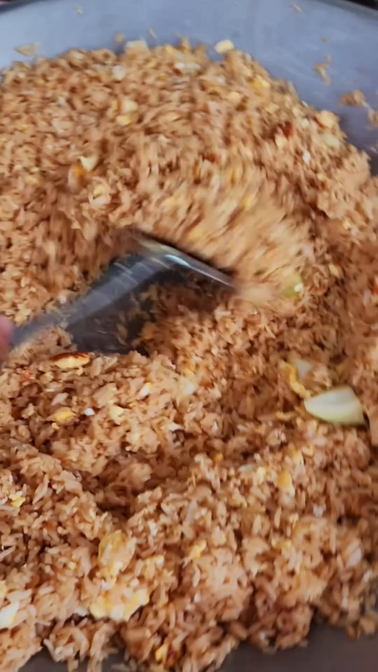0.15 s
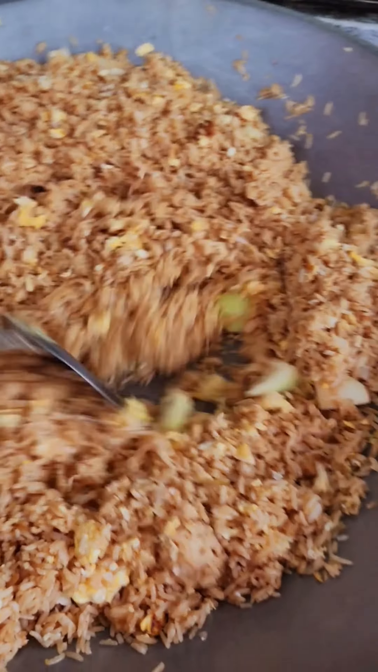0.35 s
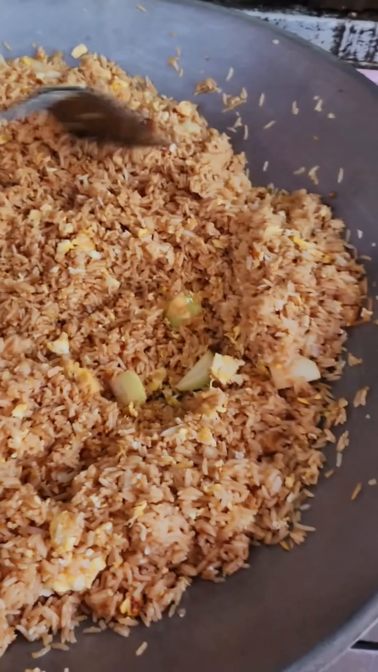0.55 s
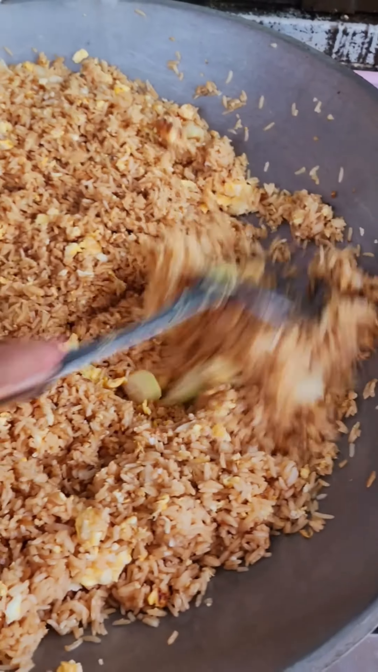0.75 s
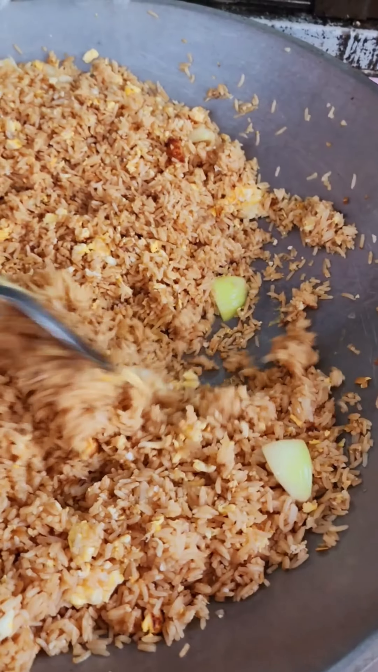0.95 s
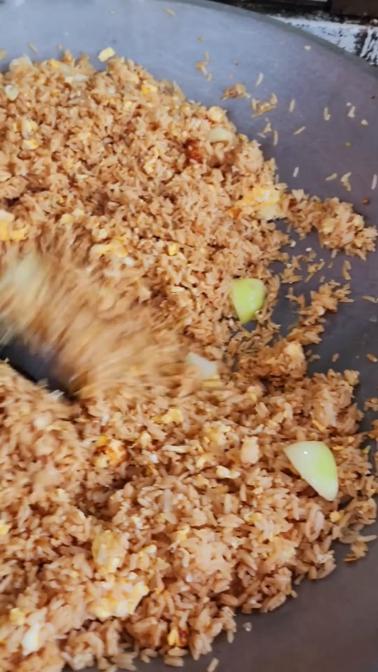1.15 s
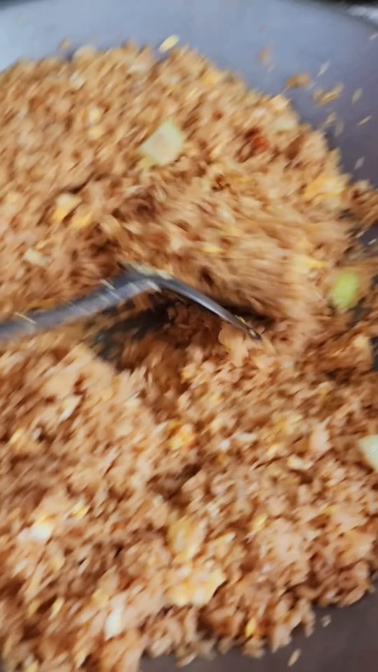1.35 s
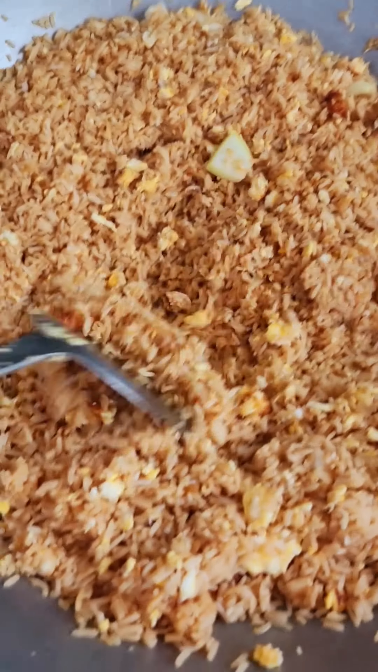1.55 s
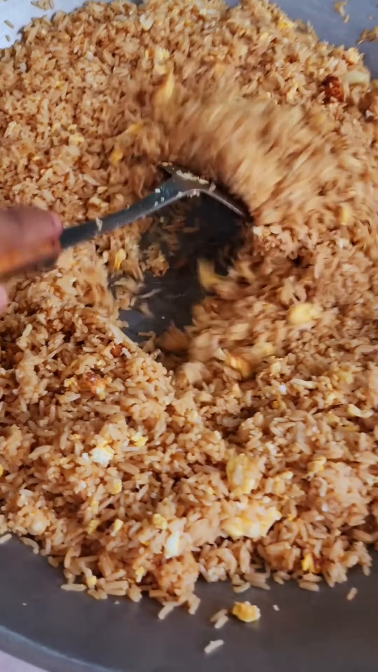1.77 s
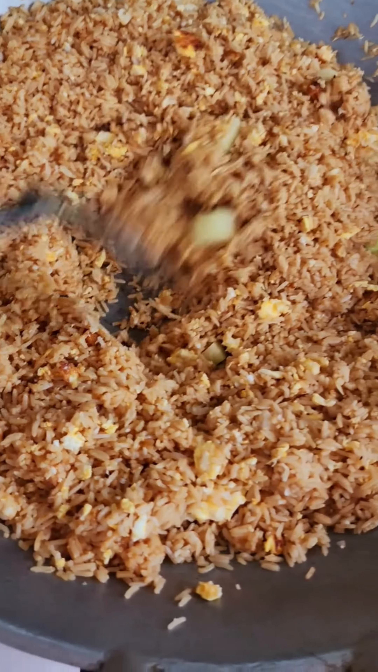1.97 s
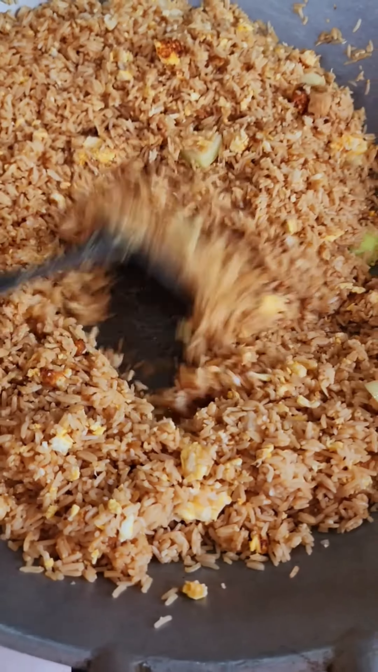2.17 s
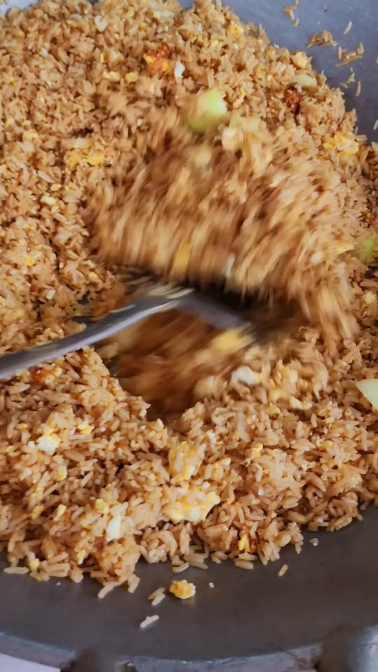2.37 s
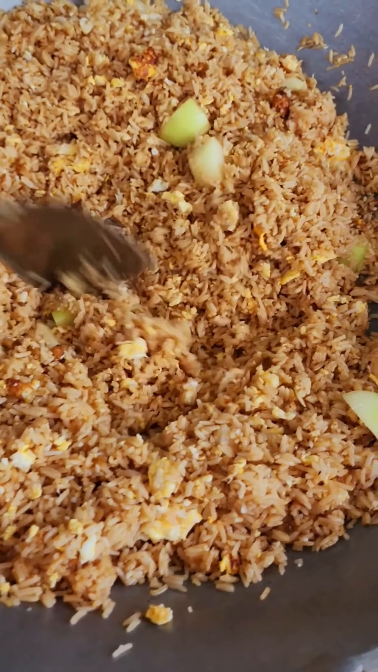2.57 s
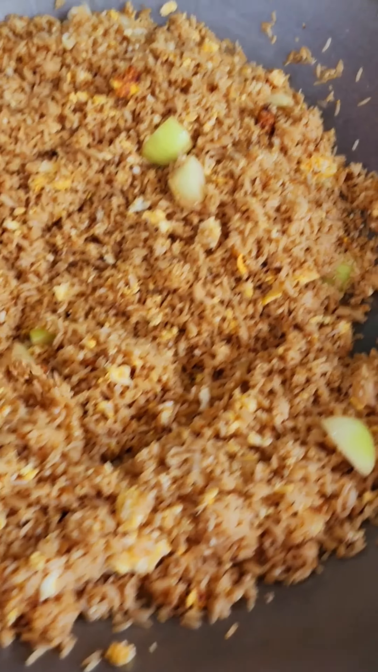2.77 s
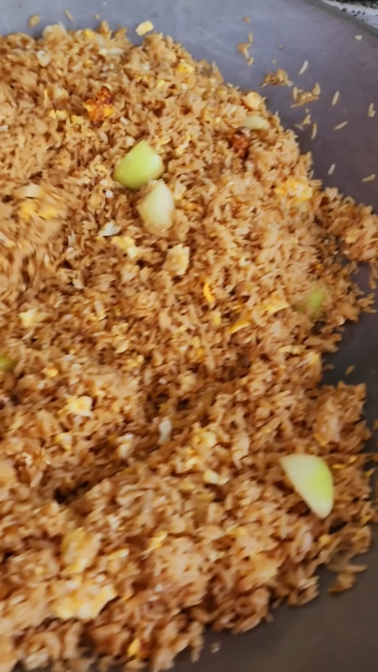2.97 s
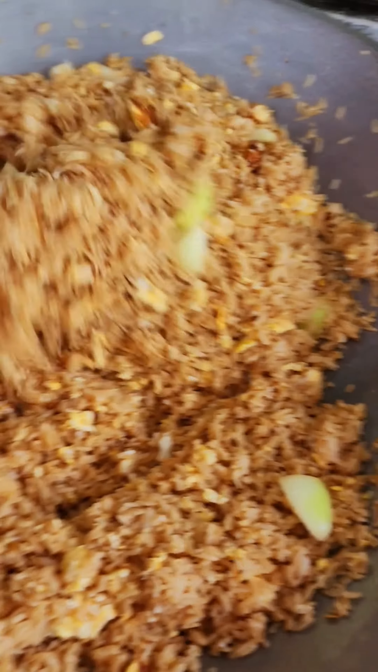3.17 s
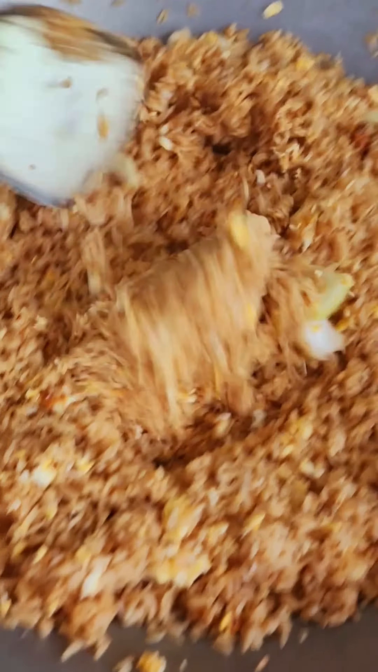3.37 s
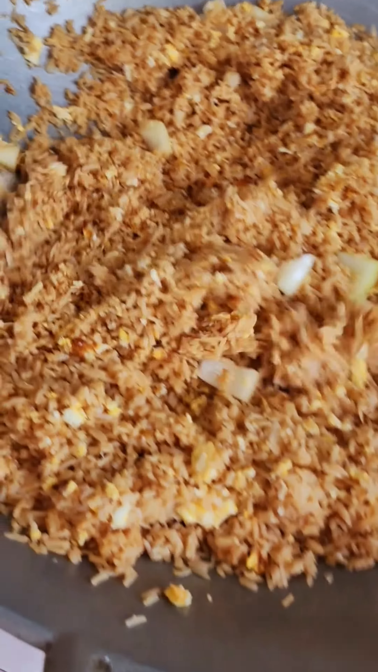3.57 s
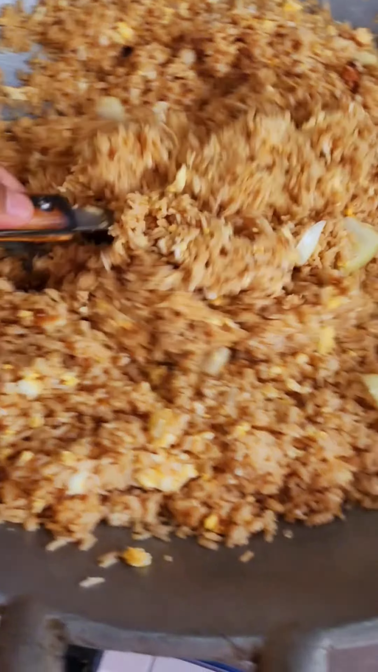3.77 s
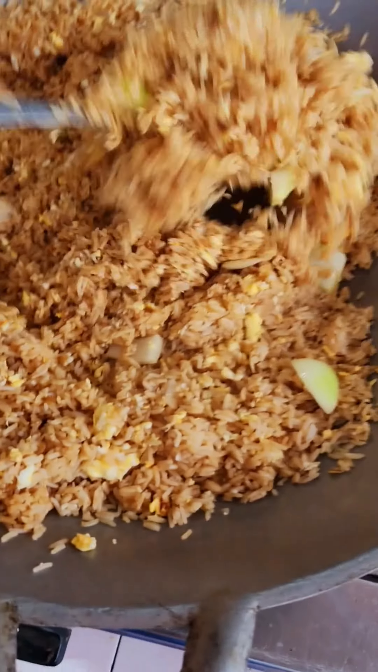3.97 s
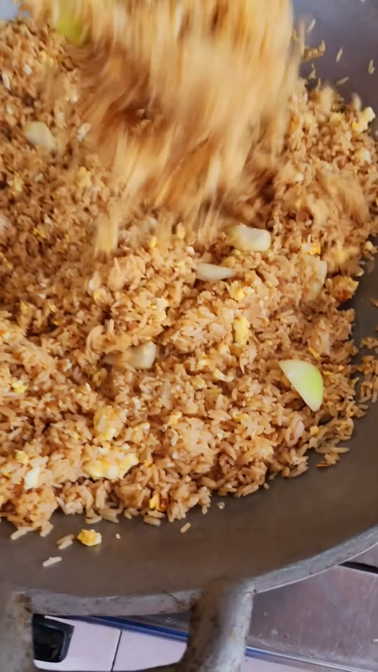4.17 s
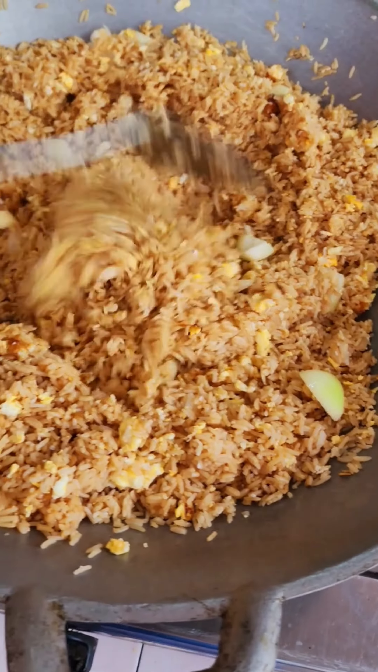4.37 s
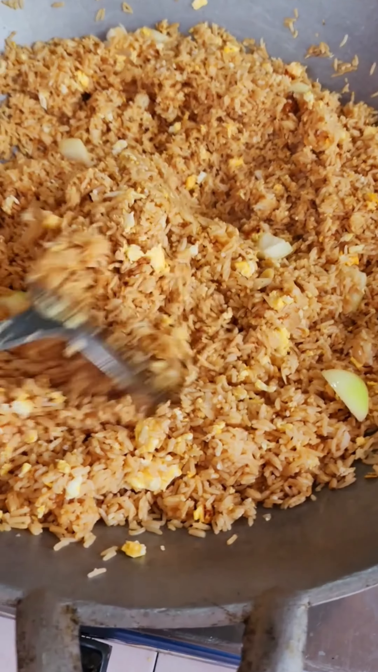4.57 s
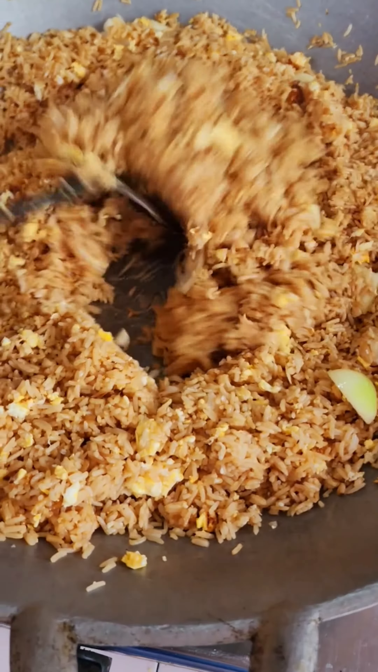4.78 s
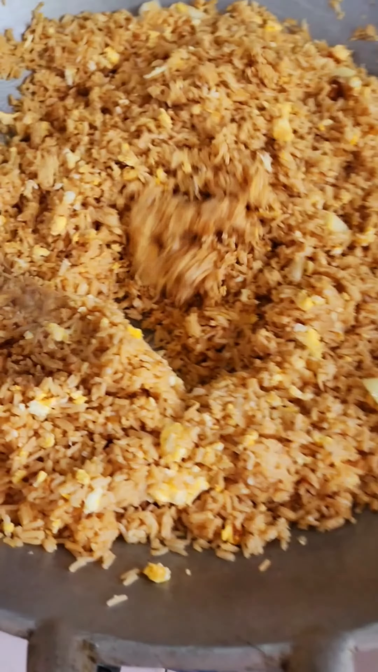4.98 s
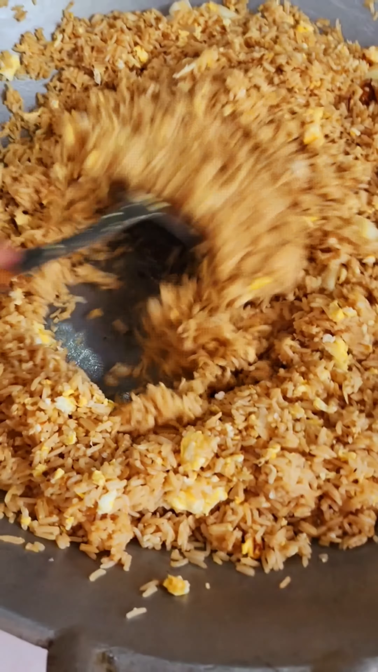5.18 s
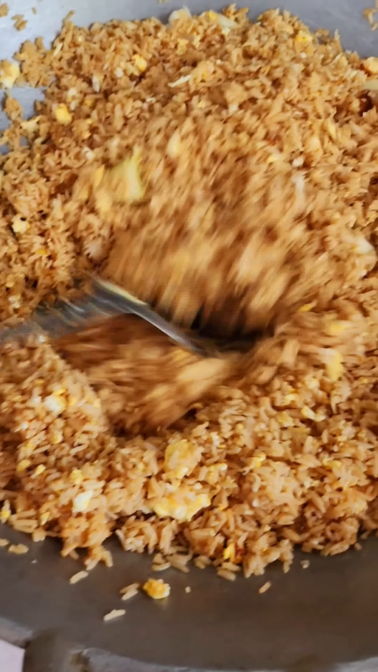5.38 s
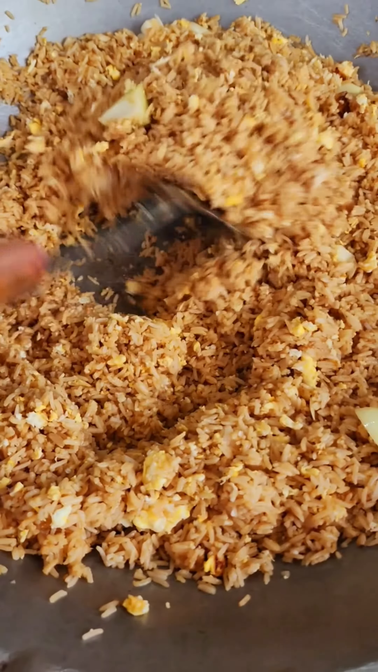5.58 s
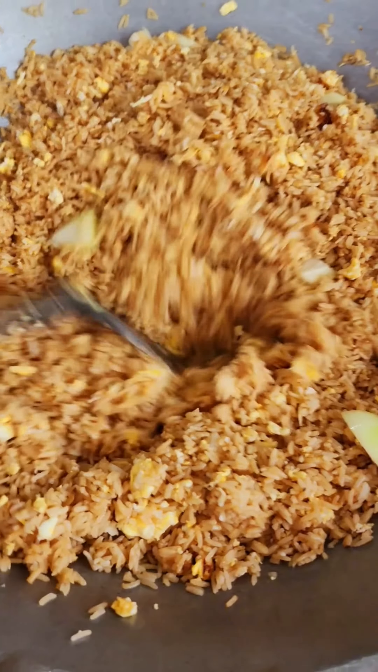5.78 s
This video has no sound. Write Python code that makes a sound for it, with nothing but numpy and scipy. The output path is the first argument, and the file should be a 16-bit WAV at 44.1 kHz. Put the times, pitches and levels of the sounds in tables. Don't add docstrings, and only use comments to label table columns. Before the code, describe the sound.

Constant crackly sizzle and a soft low gas roar lie beneath irregular spatula work. The blade hits the wok with sharp clangs and dull bowl thuds, damped quickly by rice, then stutters over grains. Two longer rasping sweeps fall mid-way, strong digs follow, and rapid scrapes end it. Heard close from above by a handheld phone in a small room.

```python
import sys
import numpy as np
from scipy import signal
from scipy.fft import rfft, irfft, next_fast_len
from scipy.io import wavfile
from scipy.ndimage import uniform_filter1d, map_coordinates

SR = 44100
rng = np.random.default_rng(int(sys.argv[2]) if len(sys.argv) > 2 else 0)


def generate_wav(sig):
    pcm = np.round(np.clip(np.atleast_2d(sig).T, -1, 1) * 32767).astype(np.int16)
    wavfile.write(sys.argv[1], SR, pcm)


def convert_level_to_amplitude(level_db):
    exponent = np.asarray(level_db, float) / 20
    return 10 ** exponent


N = 257103
PORTS = np.array([[.5], [-.5]])

# frequency [Hz], width [Hz], level [dB].
BOWL = [(221, 28, -7), (285, 30, -11), (324, 26, 0), (420, 26, -9), (490, 50, -18), (608, 28, -14),
        (780, 150, -21)]
WALL = [(1390, 197, -1.5), (1569, 118, 3.5), (1825, 190, -12), (1916, 26, 0), (2076, 230, 0)]
BLADE = [(2247, 113, 1.5), (2565, 99, 3.5), (2872, 130, 3), (3303, 160, 1.5), (3566, 240, -1),
         (3810, 220, -4), (4184, 144, 4.5), (4684, 160, 1.5)]
EDGE = [(5120, 250, -4.5), (5740, 630, -1), (6520, 350, -1), (7300, 1100, -4.5), (7910, 1100, -3),
        (9120, 340, -11), (11500, 1500, -10)]
# start [s], length [s], pressure [dB],
# load on the bowl [dB], lean on the wall [dB].
DIGS = [
    (0.0, .025, -29.5, -2, -7),
    (.663, .03, -29, -4, -3),
    (1.039, 0.077, -25, 0, -1.5),
    (1.514, 0.092, -26, 3, -1),
    (1.995, 0.075, -27, 3, -4),
    (3.557, .04, -32, -12, 5),
    (4.546, .118, -25, 1, -2),
    (4.97, .115, -23, -2, -5),
]
# frequency [Hz], density [dB per Hz].
SIZZLE = [(1500, -54), (3000, -7), (4000, -1), (5000, -0.5), (6300, 0), (8000, 0.5), (9000, -4),
          (10000, -6.5), (11000, -3.5), (12000, -.5), (14500, -2), (16500, -4.5)]
# frequency [Hz], left minus right [dB].
LEAN = [(60, -1), (110, 1), (200, 0.5), (380, 1.5), (700, 1.5), (1290, 2), (2380, -1.5), (4400, 2),
        (8120, 2.5), (15000, 5)]


def unit(x):
    return x / np.sqrt(np.mean(x ** 2) + 1e-20)


def along(points, hz):
    f, v = np.transpose(points)
    return np.interp(np.log(hz + 1), np.log(f + 1), v)


def wobble(rate_hz):
    knots = rng.standard_normal(2000)
    return map_coordinates(knots, [np.arange(N) * rate_hz / SR])


def filtered(x, response):
    n = x.shape[-1]
    m = next_fast_len(n + 2048)
    return irfft(rfft(x, m) * response(np.fft.rfftfreq(m, 1 / SR)), m)[..., :n]


def grit(shape, share, spread_db):
    clicks = (rng.random(shape) < share) * convert_level_to_amplitude(spread_db * rng.standard_normal(shape))
    return rng.standard_normal(shape) * (1 + 3 * clicks)


def metal(modes, scatter_db, spread_hz):
    hz, width, db = np.transpose(modes)[:, :, None, None]
    sign = (-1) ** np.arange(len(hz))[:, None, None]
    gain = convert_level_to_amplitude(db + scatter_db * rng.standard_normal(hz.shape)) * sign
    lead_rad = np.clip((hz / spread_hz) ** 2, 0, 2.4) * rng.uniform(-0.81, 1, hz.shape) * PORTS
    return lambda f: gain * np.exp(1j * lead_rad) * 1j * f * width / (hz * hz - f * f + 1j * f * width)


def pressure(s, length, db, rise_s, sag_db, release_db, landing_db):
    n = np.arange(round(s * SR), min(round((s + length) * SR) + SR // 12, N))
    t = n / SR - n[0] / SR
    fall_db = sag_db * np.minimum(t, length) + release_db * np.maximum(t - length, 0)
    landing = landing_db * np.exp(-t / .015)
    return n, t, convert_level_to_amplitude(db - fall_db + landing) * (1 - np.exp(-(t / rise_s) ** 2))


def knocks():
    # time [s], peak [dB], bowl thud [dB], its lowest mode [dB].
    blows = [
        (0.664, -12.5, -14, -8),
        (1.038, 1, -15, -9),
        (1.5126, -2.5, -12.5, -10),
        (1.9941, 0.5, -16, 3),
        (2.6973, -15, -26, -5),
        (3.39, -18, -25, -5),
        (3.5595, -10, -31, -5),
        (4.5443, -1, -11, -12),
        (4.9696, -5, -9, 2),
    ]
    out, t = np.zeros((2, N + SR)), np.arange(SR // 8) / SR
    for s, db, thud_db, deep_db in blows:
        blow = 0.26 * convert_level_to_amplitude(-60 * t / .06) * grit((2, len(t)), 0.041, 4)
        blow[:, [0, 14, 44, 64]] += -1.8, 2.2, -1.4, 1.9
        bright_modes = metal(WALL + BLADE + EDGE[:2], scatter_db=3.5, spread_hz=5700)
        bright = filtered(blow, bright_modes).sum(0) * convert_level_to_amplitude(-60 * t / .08)
        crack = filtered(blow * convert_level_to_amplitude(-60 * t / 0.012),
                         lambda hz: 1j * hz / (900 + 1j * hz) / (1 + 1j * hz / 9000) ** 2)
        clang = bright / np.abs(bright).max() + .8 * crack / np.abs(crack).max()
        push = np.pad(np.hanning(30), (0, len(t) - 30))
        deep, *rest = filtered(push, metal(BOWL[:4], scatter_db=1.5, spread_hz=300))
        thud = (convert_level_to_amplitude(deep_db) * deep + sum(rest)) * convert_level_to_amplitude(-60 * t / 0.18)
        hit = .85 * clang / np.abs(clang).max() + convert_level_to_amplitude(thud_db + 6) * thud / np.abs(thud).max()
        start = round((s + .0003) * SR)
        out[:, start:][:, :len(t)] += convert_level_to_amplitude(db) * hit
    return out[:, :N]


def scrapes():
    # start [s], length [s],
    # pressure [dB], load on the bowl [dB], lean on the wall [dB].
    drags = [(.115, .09, -36, -8, 1), (.7, .1, -42, -8, -1), (2.045, 0.032, -37, 0, 6.5),
             (2.15, .13, -37, -6, -1), (3.24, 0.035, -40, -10, -5), (4.18, 0.06, -36, -12, -1),
             (5.14, .12, -38, -3, 2), (5.31, .065, -24, -5, -4), (5.38, .05, -36, 2, -7),
             (5.475, .07, -34, -3, 1), (5.55, .07, -35, -8, 3), (5.685, .06, -25, -5, -4),
             (5.75, .07, -31, -6, -6)]
    sweeps = [
        (2.696, .05, -35, -12, -14),
        (2.76, .155, -24.5, -15, -14),
        (3.388, .17, -24.5, -16, -15),
    ]
    # start [s], length [s], level [dB], favoured pitch [Hz].
    lumps = [(.0, .07, -35, 480), (.09, .04, -36, 430), (1.171, 0.024, -34, 360), (2.132, 0.028, -34, 320),
             (5.15, .06, -38, 450), (5.415, .045, -29, 440), (5.492, 0.043, -30, 240),
             (5.755, 0.076, -31, 580), (2.72, .05, -36, 240), (5.0, .035, -25, 250),
             (1.075, .035, -27, 340)]
    crunches = [
        (.0, .06, -40, 560),
        (.664, .09, -36, 850),
        (1.04, .07, -38, 700),
        (2.72, .2, -42, 1000),
        (3.39, .15, -44, 900),
        (5.0, .1, -39, 650),
        (5.32, .12, -40, 600),
        (5.69, .09, -36, 650),
    ]
    squeals = [
        (4.99, .09, -25, 6400),
        (2.0, .05, -30, 6000),
        (3.41, .14, -34, 5600),
    ]
    # frequency [Hz], width [Hz], level [dB].
    rice = [(560, 160, 0), (800, 260, -1), (1100, 300, -3)]
    # pitch at first contact [Hz],
    # glide [octaves per s], bend [octaves per dB of lean].
    favoured = [(320, 0, 0), (1800, -.5, -.016), (2850, -.5, -.026), (6400, 0, 0)]

    dig, drag, sweep = (.002, 60, 300, 6, -5, 10), (.03, 20, 300, 0, -8, 0), (.005, 35, 300, 0, -8, 70)
    out = np.zeros((2, N))
    grains = grit((3, N), 0.016, 5) * convert_level_to_amplitude(1.0 * wobble(45) + 1.8 * wobble(200))
    knots = rng.standard_normal((len(BLADE), 400))
    at_knot = np.arange(N) * 45 / SR
    travel_db = 2.87 * np.array([np.interp(at_knot, np.arange(knots.shape[1]), row) for row in knots])
    travel = convert_level_to_amplitude(travel_db)

    def ring(n, modes, pitch_hz, own, reach_octaves, side_db):
        octaves = np.log2(np.transpose(modes)[0][:, None] / pitch_hz)
        favour = travel[:len(modes), n] * convert_level_to_amplitude(-13 * np.tanh((octaves / reach_octaves) ** 2))
        drive = grains[0, n] + own * grains[1:, n]
        ringing = filtered(drive, metal(modes, scatter_db=1.4, spread_hz=1300))
        part = (ringing * favour[:, None]).sum(0)
        level = np.sqrt(np.abs(uniform_filter1d((part ** 2).mean(0), size=2600)) + 1e-12)
        return part / level * convert_level_to_amplitude(side_db * PORTS)

    for rows, (*shape, edge_db, slide_db) in ((DIGS, dig), (drags, drag), (sweeps, sweep)):
        for s, length, db, load_db, lean_db in rows:
            n, t, gain = pressure(s, length, db, *shape)
            lean_db = lean_db + slide_db * np.minimum(t, length)
            # modes, level dB, own grains, reach octaves, side dB
            parts = ((BOWL, load_db, .15, 0.56, 1.5), (WALL, lean_db, .6, 0.25, -1.0),
                     (BLADE, 0, .9, 0.46, 0.3), (EDGE, edge_db, 1.5, 4.4, 0.5))
            for (hz, glide, bend), (modes, part_db, own, reach, side_db) in zip(favoured, parts):
                pitch_hz = hz * 2 ** (glide * t + bend * lean_db)
                out[:, n] += gain * convert_level_to_amplitude(part_db) * ring(n, modes, pitch_hz, own, reach, side_db)

    for rows, modes, own, reach, side_db in ((lumps, BOWL, .15, .4, 3.5), (crunches, rice, .5, .7, 3),
                                             (squeals, EDGE, 1.2, .5, 0)):
        for s, length, db, hz in rows:
            n, t, gain = pressure(s, length, db, rise_s=.012, sag_db=30, release_db=400, landing_db=0)
            out[:, n] += gain * ring(n, modes, hz, own, reach, side_db)
    return out


def spits():
    # start [s], length [s], level [dB].
    flares = [(.13, .08, -38), (.664, .03, -34), (1.04, .06, -31), (1.515, .08, -33), (1.995, .06, -30),
              (2.76, .1, -36), (3.39, .1, -34), (3.558, .04, -34), (4.195, .075, -33.5), (4.546, .06, -30),
              (4.975, .1, -27), (5.34, .04, -35), (5.71, .1, -36)]
    gains = np.zeros(N)
    for row in flares:
        n, _, gain = pressure(*row, rise_s=.004, sag_db=50, release_db=200, landing_db=2)
        gains[n] += gain
    drops = grit((2, N), .008, 3.5)
    return gains * unit(filtered(drops, lambda hz: convert_level_to_amplitude(along(SIZZLE, hz) + along(LEAN, hz) * PORTS)))


def rush(x, spectrum, patchy_db):
    # frequency [Hz], left-right likeness [-1 to 1].
    alike = [(60, 0.92), (130, 1), (290, 0.92), (640, -0.096), (1410, 0.4), (3100, -0.19), (6820, 0.0073),
             (15000, -0.026)]
    z = signal.stft(x, nperseg=512)[2]
    field = uniform_filter1d(rng.standard_normal(z.shape[1:]), size=6, axis=0)
    field = uniform_filter1d(field, size=10, axis=1)
    pair = signal.istft(z * convert_level_to_amplitude(patchy_db * unit(field)), nperseg=512)[1][:, :N]

    def colour(hz):
        turn_rad = np.arccos(np.clip(along(alike, hz), -1, 1)) / 2
        return convert_level_to_amplitude(along(spectrum, hz)) * [np.cos(turn_rad), np.sin(turn_rad)]

    mid, side = filtered(pair, colour)
    both = np.array([mid + side, mid - side])
    return unit(filtered(both, lambda hz: convert_level_to_amplitude(along(LEAN, hz) * PORTS)))


def frying():
    # time [s], sizzle [dB].
    flares = [(0.0, -35.5), (0.28, -34.5), (0.5, -38), (0.71, -37), (0.88, -35), (1.28, -38.5), (2.03, -40),
              (2.22, -35.5), (2.57, -39), (2.76, -39), (2.87, -35.5), (3.2, -37), (3.47, -37.5),
              (3.64, -33.5), (4.43, -36.5), (5.26, -35), (5.52, -35.5), (5.83, -32.5)]
    # frequency [Hz], density [dB per Hz].
    steam_spectrum = [(300, -14), (500, -3.5), (650, -2), (800, 2), (900, 1.5), (1100, -5.5), (1300, -1.5),
                      (1600, 0), (2500, -2), (3500, -2.5), (6000, -11.5)]
    burner_spectrum = [(12, -45), (25, -16), (50, -8.5), (75, -3.5), (105, 2.5), (160, -3.5), (225, -2),
                       (300, -11.5), (420, -11.5), (500, -36), (800, -41)]
    # frequency [Hz], level [dB].
    hum = [(419.9, -55)]
    t = np.arange(N) / SR
    sizzle_db = np.interp(t, *np.transpose(flares))
    for s, length, *_ in DIGS:
        sizzle_db = sizzle_db - 3 * np.exp(-((t - s - length - .045) / .03) ** 2)
    steam_db = -38.5 + 0.96 * (sizzle_db - sizzle_db.mean())
    flicker = wobble(12)
    sizzle_gain = convert_level_to_amplitude(sizzle_db + 4.0 + .5 * flicker + 0.2 * wobble(73))
    sizzle = sizzle_gain * rush(grit((2, N), .006, 3), SIZZLE, patchy_db=1.04)
    steam = convert_level_to_amplitude(steam_db + 0.72 * flicker) * rush(grit((2, N), 0.0014, 4.8), steam_spectrum, patchy_db=2.0)
    roar_gain = convert_level_to_amplitude(-41 + 1.3 * wobble(9.1) + 0.56 * wobble(2.55))
    roar = roar_gain * rush(rng.standard_normal((2, N)), burner_spectrum, patchy_db=0.1)
    hum_hz, hum_db = hum[0]
    whistle = convert_level_to_amplitude(hum_db + 3.0 + wobble(4.7)) * np.sin(2 * np.pi * hum_hz * t + 2.27 * wobble(13))
    return sizzle + steam + roar + whistle


def kitchen(x):
    # frequency [Hz], T60 [s].
    decay = [(200, 0.14), (2000, 0.26), (10000, 0.12)]
    hz, t, z = signal.stft(rng.standard_normal((2, SR // 2)), SR, nperseg=256)
    t60_s = along(decay, hz)[:, None]
    tail = signal.istft(z * convert_level_to_amplitude(-60 * t / t60_s), SR, nperseg=256)[1]
    delayed = np.pad(x, ((0, 0), (150, 0)))
    return signal.fftconvolve(delayed, tail / np.linalg.norm(tail[0]), axes=1)[:, :N]


def scene():
    steel = scrapes() + knocks()
    return steel + convert_level_to_amplitude(-8.5) * kitchen(steel) + frying() + spits()


def low_pass(x):
    return signal.sosfilt(signal.butter(12, 16990, fs=SR, output="sos"), x)


def record(dry):
    mid = dry.mean(0)
    side = filtered(dry[0] - mid, lambda hz: hz ** 2 / (hz ** 2 + 100 ** 2))
    both = np.array([mid + side, mid - side])
    dull = filtered(both, lambda hz: np.clip((15960 - hz) / 150, 0, 1))
    soft = dull / (1 + np.abs(dull / .99) ** 6) ** (1 / 6)
    return low_pass(soft)


dry = scene()
out = record(dry)
generate_wav(out)
```